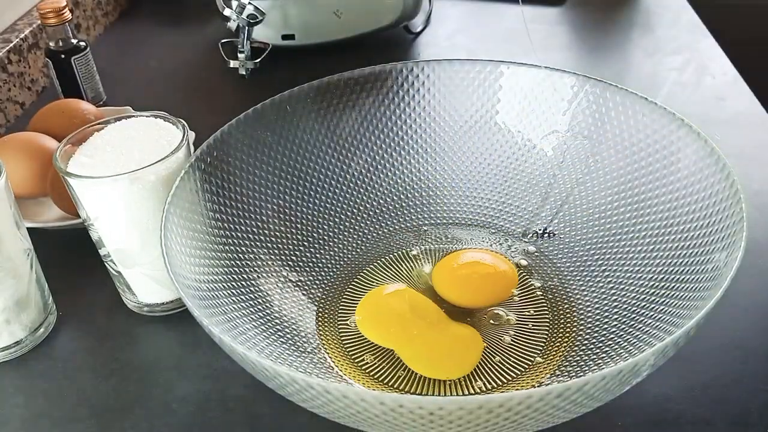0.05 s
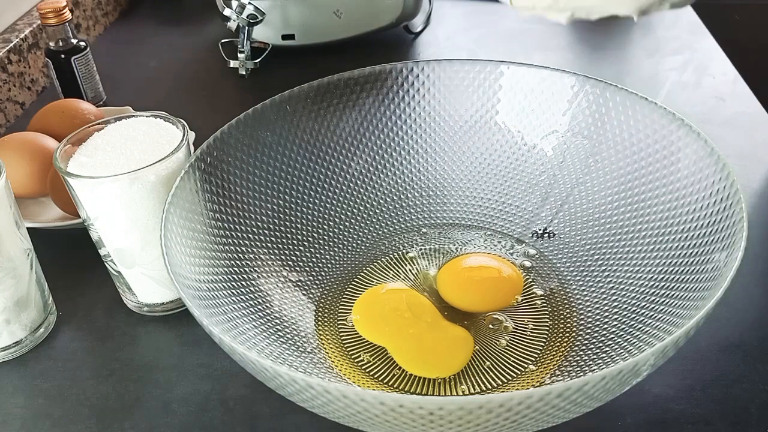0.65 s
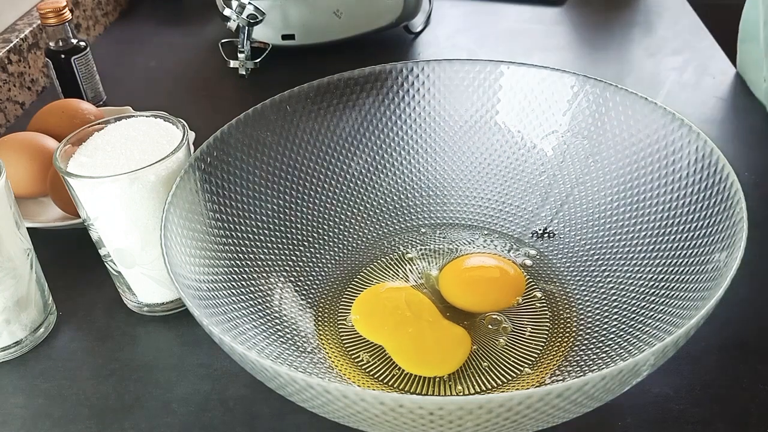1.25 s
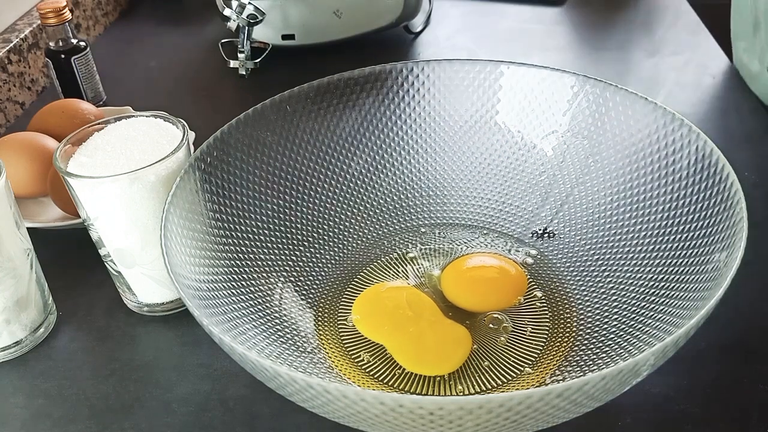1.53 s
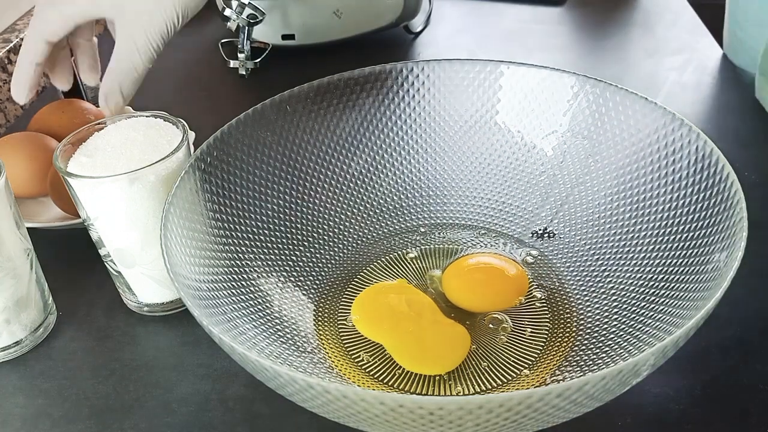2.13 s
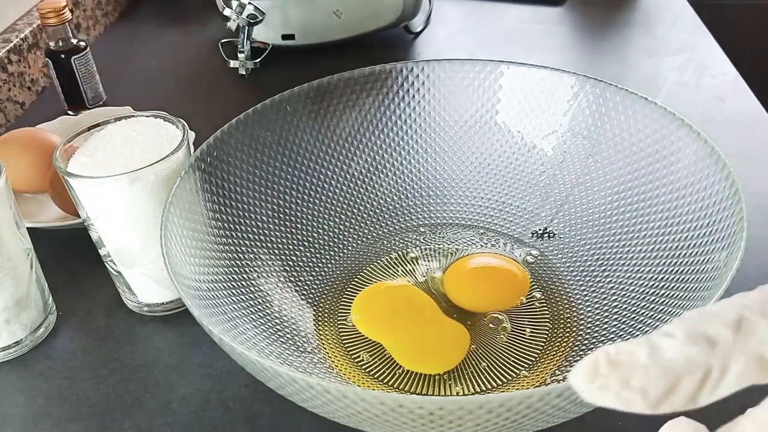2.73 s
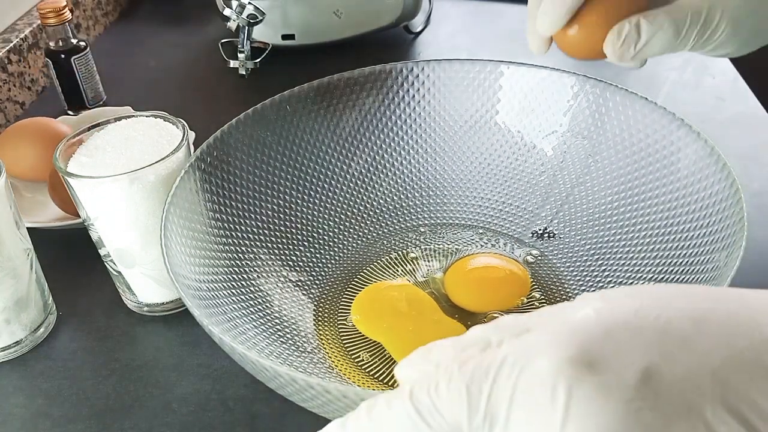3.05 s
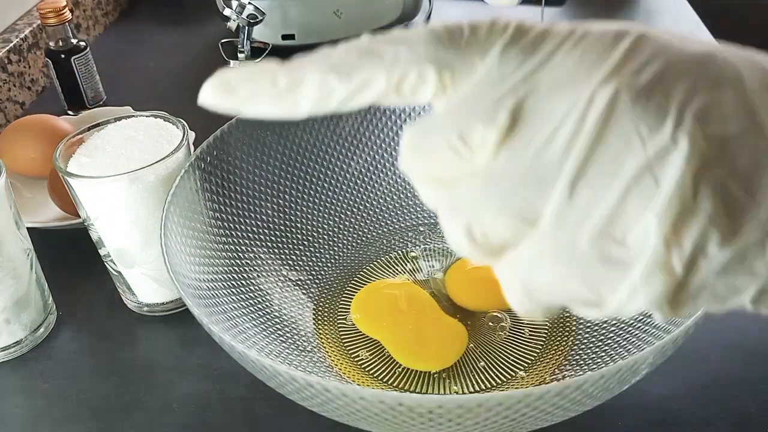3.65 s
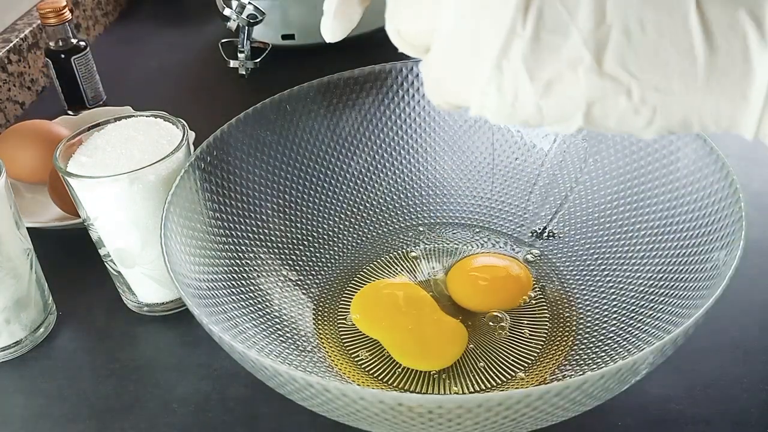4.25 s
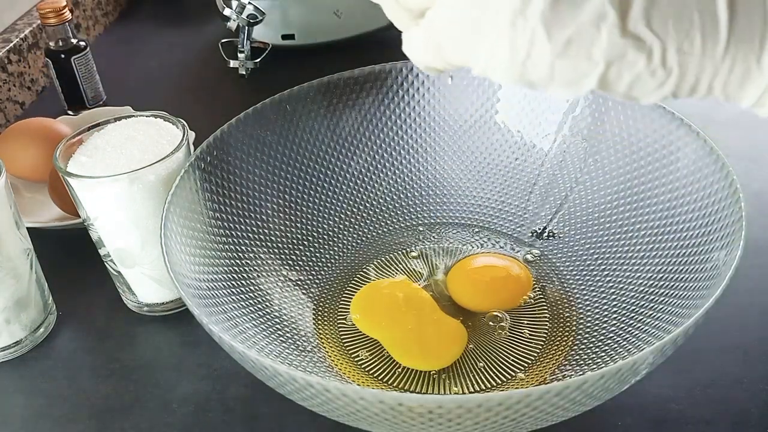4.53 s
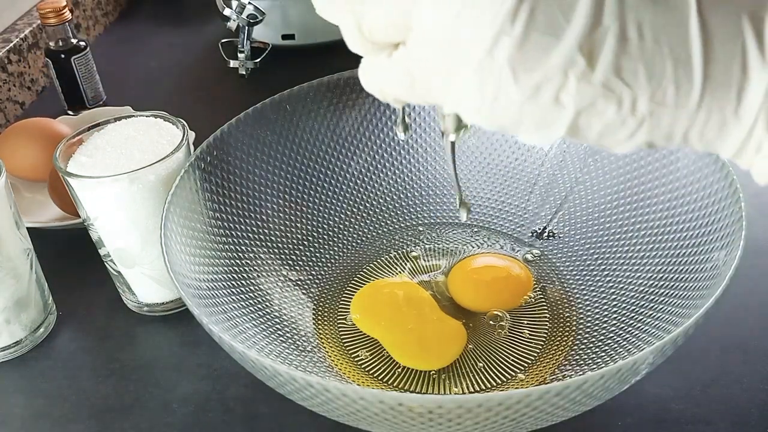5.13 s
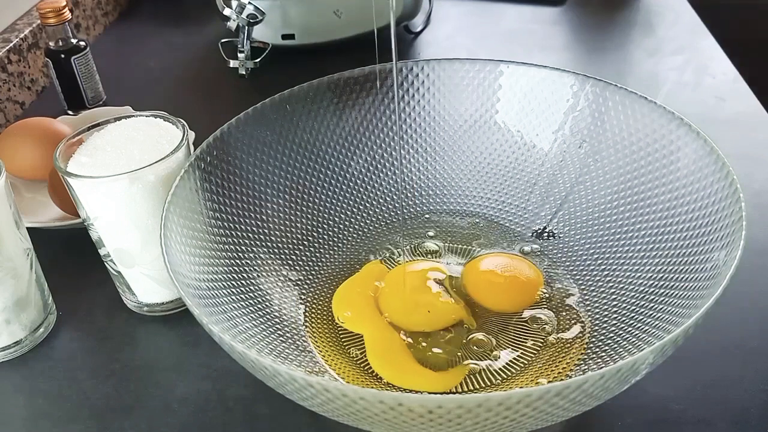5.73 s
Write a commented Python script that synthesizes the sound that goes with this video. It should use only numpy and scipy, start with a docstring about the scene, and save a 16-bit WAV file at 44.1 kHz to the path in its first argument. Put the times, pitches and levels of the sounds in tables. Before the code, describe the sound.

In a small, quiet kitchen, an emptied eggshell clicks and crunches softly as it is set aside. An egg is knocked twice on the counter, a dull thud and then a sharp, louder crack, each making a glass bowl ring briefly. The shell is prised apart in crisp little snaps and the egg drops into the bowl with a soft, wet slop. Rubber gloves rustle very faintly over a low room hum. Everything is heard up close.

```python
"""A small, live kitchen, where gloved hands break eggs over a glass bowl on the counter.
An emptied shell clicks and crunches as it is set aside. The next egg is knocked twice on the counter,
a thud and then a crack, and each jolt sets the bowl ringing. The shell is prised apart in crisp snaps
and the egg slops into the bowl in a gush of tiny bubbles. Rubber gloves rustle; the room hums faintly."""
import sys
import numpy as np
from scipy import signal
from scipy.fft import rfft, irfft, next_fast_len
from scipy.io import wavfile
from scipy.ndimage import uniform_filter1d

SR = 44100
rng = np.random.default_rng(int(sys.argv[2]) if len(sys.argv) > 2 else 0)


def transcribe(u):
    """Save the signal u as a 16-bit wav file named by the first command-line argument.

    u: samples, shape (n,) or (channels, n), limited to [-1, 1]; the rate is SR.
    q: integer samples, one column per channel.
    """
    v = np.clip(np.atleast_2d(u).T, -1, 1)
    q = np.round(v * 32767).astype(np.int16)
    wavfile.write(sys.argv[1], SR, q)


N = 258867
SIZE = 8192  # samples in a one-shot
TIME, AGE, LONG_AGE = np.arange(N) / SR, np.arange(SIZE) / SR, np.arange(3 * SIZE) / SR


# hits of egg on counter: t/s, level/dB, crumble t60/s, share of fracture/0-1
KNOCKS = [(3.227, -0.5, 0.013, 0), (3.2308, -8, 0.012, 0.3), (3.2354, -0.5, 0.017, 0.05),
          (3.2437, -5, 0.02, 0.03), (3.2498, -11, 0.042, 0.04), (3.2575, -11.5, 0.022, 0.18),
          (3.5129, -20, 0.022, 0.6), (3.5169, -2.5, 0.0028, .8), (3.5181, 8.5, 0.0044, 1),
          (3.5205, 1.5, 0.016, 1), (3.5317, -8.5, 0.033, 0.9), (3.5426, -9, 0.026, .8)]
# EQ of a blunt thud and of a cracking shell: f/Hz, level/dB
THUD_EQ = [(30, -27), (60, -28.5), (120, -8), (240, -10.5), (430, -3), (620, -5), (800, -1), (1000, -4),
           (1150, 0.5), (1400, -10.5), (1800, -15.5), (2900, -20.5), (4000, -31), (5600, -35), (6550, -18),
           (7100, -22.5), (10000, -37), (15000, -58)]
FRACTURE_EQ = [(30, -21.5), (60, -26.5), (120, -16.5), (240, -12.5), (550, -11), (800, -3), (1200, 2),
               (1750, 1), (2020, -5.5), (2300, 6), (2650, -6), (3050, -4), (3450, -13), (5800, -12.5),
               (7800, -6.5), (11000, -16.5), (13500, -21.5), (15500, -36)]
# pan of the knocks between the two microphone ports: f/Hz, left over right/dB
KNOCK_PAN = [(120, -1.5), (500, -1.5), (1100, -2.5), (2200, 6), (4500, 2), (7000, 6.5), (8500, -7),
             (13000, -2)]

def knocks(impact_gain=0.54, grain_db=4, room_db=-2, lag_s=0.00009):
    """The egg thuds, then caves in; each impact reaches the left port a little earlier."""
    out = np.zeros((2, N))
    pan_db = at_hz(KNOCK_PAN, np.fft.rfftfreq(SIZE, 1 / SR))
    thud, fracture = pulse(THUD_EQ, pan_db), pulse(FRACTURE_EQ, pan_db)
    impact = np.array([AGE == 0, AGE == AGE[round(lag_s * SR)]])
    for start, db, t60, broken in KNOCKS:
        grains = np.sqrt(1 - impact_gain ** 2) * crumble(t60, grain_db)
        force = whiten(grains + impact_gain * impact, t60)
        colour = np.sqrt(1 - broken) * thud + np.sqrt(broken) * fracture
        add(out, start, from_db(db) * through(force, colour))
    out = close_ports(out)
    return np.array([out, from_db(room_db) * out])


# modes of the glass bowl: f/Hz, level after the thud/dB, level after the crack/dB, t60/s
BOWL_MODES = [(301, -48, -47, .38), (348, -39, -42, .16), (421, -30, -42, .18), (478, -31, -35, .19),
              (598, -33, -33, .19), (680, -41, -43, .38), (752, -35.5, -42, .4), (797, -32, -38, .17),
              (875, -32, -39, .12), (1088, -22.5, -34, .12), (1222, -23.5, -28, .14), (1497, -34, -33, .13),
              (1613, -43, -48, .33), (1832, -38, -36, .18), (2215, -37, -35, .16), (2260, -41, -41, .29),
              (2326, -44, -46, .26), (2392, -42, -43, .18), (2966, -40, -41, .31), (3005, -36, -39, .13),
              (3738, -55, -52, .3), (4630, -56, -54, .28), (5526, -54.5, -55, .28), (6042, -56, -54, .28),
              (6565, -43, -50, .2), (6915, -48, -44, .22), (7297, -45, -45, .24), (7430, -55, -48, .16),
              (7617, -55, -50, .3), (7811, -53, -50, .25), (8300, -52, -43, .17), (8805, -58, -50, .22),
              (11400, -60, -54, .15), (13600, -64, -56, .13)]

def bowl(thud_s=3.2275, crack_s=3.5177, attack_s=0.00047, twin_detune=0.0069, twin_db=-7):
    """Jolts through the counter ring the glass; it is not quite round, so each mode beats with a twin."""
    out = np.zeros((2, N))
    for hz, *levels, t60 in BOWL_MODES:
        stereo_angle = np.arccos(at_hz(STEREO_LIKENESS, hz))
        for start, db in zip((thud_s, crack_s), levels):
            envelope = from_db(db) * decay(t60, LONG_AGE) * fade_in(attack_s, LONG_AGE)
            for pitch, gain in ((hz, 1), (hz * (1 + twin_detune), from_db(twin_db))):
                apart = stereo_angle * rng.choice([-1, 1])
                phase = rng.uniform(0, 2 * np.pi) + np.array([[0], [apart]])
                add(out, start, gain * envelope * np.sin(2 * np.pi * pitch * LONG_AGE + phase))
    return out


# shell snaps: t/s, level/dB, ring f/Hz, edge trim/dB, swell time constant/cycles, room send/dB
SNAPS = [(0, -29, 1910, -19.5, 0.73, 4), (.004, -38.5, 1760, -29, 2.1, -2),
         (0.0171, -29.5, 2240, -38, 2.1, -4), (0.0299, -27, 2070, -31, 0.88, 0.5),
         (0.0322, -31, 1620, -31, 1.8, -6), (.042, -34.5, 2040, -19, 0.71, -5),
         (0.1632, -40.5, 2090, -10.5, 0.73, -1), (0.1931, -32, 1770, -24, 0.84, -3.5),
         (1.788, -34, 1560, -35, 0.64, 0.5), (2.6046, -68, 5200, -8, 2, -6),
         (2.9928, -72, 4445, -8, 2.5, -2.5), (5.0979, -34, 2230, -12, 2.3, 0),
         (5.1362, -58, 2560, 1, 0.82, -3), (5.2299, -48.5, 2100, 4, 1.62, -2.5),
         (5.2743, -56, 2120, -7, 1.57, -1), (5.3211, -51.5, 1350, -3, 0.62, 1),
         (5.3214, -47, 2320, -9.5, 0.83, -8), (5.4074, -48, 1820, -3, 0.85, -7),
         (5.4093, -42.5, 2020, -7.5, 0.6, -3.5), (5.4556, -43, 4300, -15, 1.6, -5),
         (5.5143, -44, 3900, -7.5, 1.5, -0.5), (5.7452, -48, 2446, -5.5, 1.2, -1)]
# EQ of a half shell's body and of its crisp edge: f/Hz, level/dB
SHELL_EQ = [(400, -46), (900, -13.5), (1300, -9.5), (1600, -3.5), (2300, 5), (3000, -2.5), (4000, -15),
            (7000, -25), (14000, -39)]
CRISP_EQ = [(500, -10), (1500, 4), (3000, 4), (4500, 0), (6500, 6.5), (8500, 10.5), (10500, 1),
            (13500, -7.5), (16000, -30)]

def snaps(ring_db=3.5, edge_db=20, body_db=14.5, crumble_t60=0.018, ordinary_shell_hz=2100):
    """Each snap rings the half shell for a few cycles under a crisp edge; smaller pieces sound higher."""
    out, crisp = np.zeros((2, 2, N)), pulse(CRISP_EQ)
    for start, db, hz, trim_db, cycles, room_db in SNAPS:
        body = pulse(np.array(SHELL_EQ) * [hz / ordinary_shell_hz, 1])
        colour = from_db(edge_db + trim_db) * crisp + from_db(body_db) * body
        crackle = through(crumble(crumble_t60, grain_db=3.2), colour)
        ring = from_db(ring_db) * swell(hz, cycles / hz)
        add(out, start, from_db(db) * in_hands(start, ring + crackle, room_db))
    return out


# crunches and dry ticks: t/s, body level/dB, edge level/dB, t60/s, hollowness/0-1, attack/s
CRUNCHES = [(.240, -18.5, -29, 0.06, 0.92, 0.013), (0.2601, -20, -30, 0.019, 0.97, 0.00066),
            (0.464, -27, -42, 0.0098, 0.99, 0.00044), (0.6, -32.5, -59, 0.0036, 0.87, 0.00028),
            (.643, -24.5, -41.5, 0.053, 1, 0.00019), (1.165, -19, -31, 0.016, 0.42, 0.00035),
            (1.415, -25, -41, 0.081, 0.94, 0.0078), (1.558, -22.5, -23, 0.056, 0.83, 0.018),
            (1.729, -19, -28, 0.41, 0.75, 0.00078), (1.787, -9.5, -41, 0.11, 0.55, 0.00024),
            (1.899, -17.5, -19.5, 0.12, 0.23, 0.0011), (1.992, -17.5, -28, 0.048, 1, 0.00051),
            (2.099, -19, -30.5, 0.14, 0.1, 0.00079), (4.1468, -65, -46.5, 0.0095, 0.44, 0.0002),
            (4.2137, -50, -58, 0.046, 0.02, .002), (4.274, -58, -50, 0.014, 0.47, 0.00098),
            (4.365, -45, -43, 0.065, 0.37, .006), (4.869, -35, -36.5, 0.02, 0.43, 0.0014),
            (4.8991, -47, -28, 0.027, 0.3, .0005), (5.004, -42, -34.5, 0.016, 0.5, 0.0003),
            (5.068, -27.5, -31.5, 0.053, 0.39, 0.019), (5.1038, -36, -23, 0.014, 0.4, 0.00022),
            (5.1092, -40, -24.5, 0.011, 0, 0.00028), (5.139, -37, -26, 0.015, 0, .0003),
            (5.342, -52, -36, .03, .5, .001), (5.3863, -46, -24, 0.022, 0.2, 0.00033),
            (5.4564, -19.5, -26, 0.028, 0.57, 0.00018), (5.465, -36, -30.5, 0.041, 0.4, .002),
            (5.615, -39, -39.5, .03, 0.07, 0.0005)]
# EQ of a hollow cup of shell: f/Hz, level/dB
HOLLOW_EQ = [(290, -45.5), (500, -14), (730, -8.5), (950, 3), (1350, -7), (1800, -10), (2200, -8),
             (2900, -14), (3700, -25.5), (6500, -31), (11000, -48)]

def crunches(grain_db=5, room_db=-1.5):
    """Shell gives way or rubs in short runs of fractures; a whole cup sounds hollower than a piece."""
    out = np.zeros((2, 2, N))
    crisp, hollow, shell = pulse(CRISP_EQ), pulse(HOLLOW_EQ), pulse(SHELL_EQ)
    for start, body_db, edge_db, t60, hollowness, attack_s in CRUNCHES:
        layers = [(from_db(body_db) * np.sqrt(hollowness), hollow),
                  (from_db(body_db) * np.sqrt(1 - hollowness), shell),
                  (from_db(edge_db), crisp)]
        sound = sum(gain * through(crumble(t60, grain_db, attack_s), colour) for gain, colour in layers)
        add(out, start, in_hands(start, sound, room_db))
    return out


# ring-outs of half shells after hard snaps: t/s, level/dB, f/Hz, t60/s
CUP_RINGS = [(0.031, -42, 1905, 0.24), (.195, -60, 1900, 0.16), (5.099, -50, 2554, 0.2)]

def cup_rings(waver=0.33, attack_s=0.0039):
    """The hollow of a half shell rings on, wavering as it moves in the hand."""
    out = np.zeros((2, N))
    for start, db, hz, t60 in CUP_RINGS:
        wobble = waver * np.array([wander(AGE, step=256) for _ in range(2)])
        envelope = from_db(db) * decay(t60, AGE) * fade_in(attack_s, AGE)
        add(out, start, envelope * (1 + wobble) * np.sin(2 * np.pi * hz * AGE + wobble[::-1]))
    return out


# wet plops: t/s, level/dB, f/Hz, swell time constant/s, glide/share of pitch
PLOPS = [(0.245, -42, 1208, 0.0051, -0.13), (.261, -57, 990, 0.0027, -0.062),
         (.644, -58.5, 967, 0.002, -0.052), (.675, -54.5, 970, 0.002, -0.05),
         (1.348, -53, 902, .0045, 0.04), (1.992, -47, 988, 0.002, -0.05),
         (5.1, -55.5, 1068, 0.0026, -0.0023), (5.109, -47, 2550, .0009, .05),
         (5.124, -51, 2680, .0014, 0.00079), (5.137, -59.5, 1220, 0.0038, 0.003),
         (5.139, -54, 2360, 0.0024, 0.05), (5.4562, -51, 890, 0.0006, .02),
         (5.458, -53, 5930, 0.0011, 0.017), (5.466, -45.5, 6100, 0.0015, -0.011),
         (5.463, -42.5, 6700, 0.0011, 0.02), (5.4624, -45, 1055, 0.0015, 0.14),
         (5.466, -47, 1382, 0.0036, 0.108), (5.4805, -48.5, 2080, .0008, 0.074),
         (5.481, -48, 5950, 0.0023, 0.002), (5.485, -57, 1470, 0.0024, .03)]

def plops(roughness=0.8, room_db=-4):
    """Pockets of air ring briefly in the thick egg white, sliding in pitch as they open or close."""
    out = np.zeros((2, N))
    for start, db, hz, swell_s, glide in PLOPS:
        tone = swell(hz, swell_s, glide)
        rough_tone = tone * (1 + roughness * wander(AGE, step=64))
        add(out, start, from_db(db) * np.linalg.norm(tone) * unit_energy(rough_tone))
    return np.array([out, from_db(room_db) * out])


# gushes as the shell opens and the egg lands: fullest t/s, level/dB, low f/Hz, high f/Hz, t60/s
GUSHES = [(5.085, -62, 1400, 3000, .35), (5.462, -54, 1300, 3140, .15), (5.47, -63, 2760, 9000, .8)]

def squelch(bubbles=50, attack_s=0.015, size_db=5, cycles=0.75, glide=0.065, room_db=-4):
    """In each gush of egg white, tiny films and bubbles burst at random as short, rising blips."""
    out = np.zeros((2, N))
    for fullest, db, low_hz, high_hz, t60 in GUSHES:
        for when, pitch, size, pan in rng.random((bubbles, 4)):
            age = when * (attack_s + t60) - attack_s
            hz = low_hz * (high_hz / low_hz) ** pitch
            boost_db = size_db * min(-np.log(1 - size), 2)
            gain = from_db(db + boost_db) * gesture(age, attack_s, 0, t60)
            if fullest + age < TIME[-1]:
                blip = swell(hz, cycles / hz, glide)
                add(out, fullest + age, gain * blip * np.sqrt([[pan], [1 - pan]]))
    return np.array([out, from_db(room_db) * out])


# strokes of glove over shell: t/s, hold/s, level/dB
STROKES = [(0, 0.31, -70), (0.588, 0.032, -71), (1.311, 0.12, -68), (1.596, 0.38, -70), (1.952, 0.091, -64),
           (2.33, 0.076, -71.5), (2.716, 0.13, -75.5), (2.992, .08, -78.5), (3.708, 0.092, -67),
           (4.249, 0.11, -79.5), (5.02, 0.086, -70.5), (5.331, 0.16, -63)]
# EQ of the rubber rustle: f/Hz, level/dB
GLOVE_EQ = [(700, -11), (1500, 1.5), (2400, 4.5), (3500, -6), (5000, -12), (7500, -3), (9200, -5),
            (10500, -17.5), (14000, -32.5)]

def gloves(attack_s=0.05, release_t60=0.83, holding_db=-81.5, flutter_db=2, grain_db=0.5):
    """Rubber sticks and slips over shell in a faint, grainy rustle that swells with each stroke."""
    texture = from_db(flutter_db * wander(TIME, step=512) + grain_db * wander(TIME, step=64))
    strokes = [from_db(db) * gesture(TIME - start, attack_s, hold_s, release_t60)
               for start, hold_s, db in STROKES]
    envelope = np.maximum(np.max(strokes, axis=0), from_db(holding_db))
    return envelope * texture * noise_bed(GLOVE_EQ)


# EQ of a gloved palm on glass: f/Hz, level/dB
GRIP_EQ = [(90, -14), (180, -2), (380, 0), (750, -6), (1400, -16.5), (3000, -29), (6000, -44.5)]

def grip(start_s=2.98, attack_s=0.06, hold_s=0.2, release_t60=0.3, db=-67):
    """The palm steadies the bowl with a soft, low rub."""
    return from_db(db) * gesture(TIME - start_s, attack_s, hold_s, release_t60) * noise_bed(GRIP_EQ)


def thin_high_tone(start_s=3.92, attack_s=0.09, hold_s=0.17, release_t60=0.38, hz=9078, db=-82):
    """A faint, thin, narrow tone near 9 kHz swells and fades after the crack."""
    radius = np.exp(-np.pi * 70 / SR)  # two resonators in series, each 70 Hz wide
    poles = [1, -2 * radius * np.cos(2 * np.pi * hz / SR), radius ** 2]
    tone = signal.lfilter([1], np.convolve(poles, poles), rng.standard_normal((2, N)))
    envelope = from_db(db) * gesture(TIME - start_s, attack_s, hold_s, release_t60)
    return envelope * unit_energy(tone) * np.sqrt(N)


# length of the reverb tail: f/Hz, t60/s
REVERB_T60 = [(100, 0.52), (500, 0.49), (1200, 0.3), (2400, 0.44), (5000, 0.21), (8000, .39), (14000, 0.16)]
# EQ of the reverb tail: f/Hz, level/dB
REVERB_EQ = [(100, 1.5), (500, -3.5), (1200, -8), (2400, -9.5), (4500, -5), (8000, -8), (14000, -9.5)]

def kitchen_reverb(send, early_db=-4, early_t60=0.083, predelay_s=0.001516, attack_s=0.005, top_hz=12000):
    """Quick reflections from counter and bowl, then the tail of the room, dying band by band."""
    hz, centres = np.fft.rfftfreq(len(LONG_AGE), 1 / SR), np.geomspace(100, 14000, 9)
    noise_spectrum = rfft(diffuse(rng.standard_normal((2, len(LONG_AGE)))))
    response = 0
    for centre, weights in zip(centres, np.eye(len(centres))):
        band = irfft(noise_spectrum * at_hz(np.c_[centres, weights], hz))
        envelope = decay(at_hz(REVERB_T60, centre), LONG_AGE) * fade_in(attack_s, LONG_AGE)
        response += band * from_db(at_hz(REVERB_EQ, centre)) * unit_energy(envelope)
    add(response, predelay_s, from_db(early_db) * crumble(early_t60, grain_db=0.85))
    high_cut = signal.butter(8, top_hz, fs=SR, output="sos")
    return through(send, signal.sosfilt(high_cut, response))


# EQ of the room tone: f/Hz, level/dB
ROOM_TONE_EQ = [(25, -29), (50, -13), (90, 0), (170, -2.5), (250, -2), (450, -4), (800, -8), (1300, -17.5),
                (2300, -14), (3000, -20.5), (4300, -34.5), (7500, -36), (9300, -36.5), (12000, -59)]

def room_tone(noise_db=-65, motor_hz=95, motor_db=-77):
    """Soft room noise with the faint drone of an appliance, leaning slightly right."""
    motor = from_db(motor_db) * np.sin(2 * np.pi * motor_hz * TIME)
    return (from_db(noise_db) * noise_bed(ROOM_TONE_EQ) + motor) * from_db([[-0.4], [0.4]])


# the hands carry the empty shell away and return with the next egg: t/s, microphone distance/m
HAND_PATH = [(.7, 0.36), (1.15, 1), (2.2, 1), (3.1, 0.38)]

def in_hands(start, sound, room_db, over_bowl_m=0.3):
    """Direct sound and room send; only the direct sound falls as the hands move away."""
    distance = np.interp(start, *np.transpose(HAND_PATH))
    return np.array([over_bowl_m / distance * sound, from_db(room_db) * sound])


# stereo image of the room: f/Hz, left-right correlation/-1 to 1
STEREO_LIKENESS = [(25, -0.78), (70, 0.94), (250, 0.92), (500, 0.42), (1000, 0.039), (2000, -0.1),
                   (5000, 0.033), (12000, -0.22)]

def diffuse(pair):
    """Two unrelated noises become a diffuse field: alike in the bass, apart in the treble."""
    size = pair.shape[-1]
    alike = at_hz(STEREO_LIKENESS, np.fft.rfftfreq(size, 1 / SR))
    mid, side = rfft(pair) * np.sqrt([(1 + alike) / 2, (1 - alike) / 2])
    return irfft([mid + side, mid - side], size)


def close_ports(x, mono_below_hz=400):
    """The microphone ports lie close together, so the bass of a nearby knock reaches both alike."""
    mid, side = (x[0] + x[1]) / 2, (x[0] - x[1]) / 2
    side = signal.sosfilt(signal.butter(1, mono_below_hz, "high", fs=SR, output="sos"), side)
    return np.array([mid + side, mid - side])


def crumble(t60, grain_db, attack_s=1e-6):
    """A dying run of grains of uneven size, like tiny fractures, flat in colour."""
    noise = diffuse(rng.standard_normal((2, SIZE)))
    grain_gain = from_db(grain_db * np.repeat(rng.standard_normal(SIZE // 32), 32))
    return whiten(noise * grain_gain * decay(t60, AGE) * fade_in(attack_s, AGE) ** 2, t60)


def whiten(burst, t60):
    """Flatten the colour of a one-shot and gate off its second half."""
    spectrum = rfft(burst)
    power = uniform_filter1d(np.abs(spectrum) ** 2, size=int(1 / t60) + 1, axis=-1)
    flat = irfft(spectrum / np.sqrt(np.abs(power) + 1e-20))
    return unit_energy(flat * (AGE < AGE[-1] / 2))


def swell(hz, swell_s, glide=0):
    """A damped resonance that swells to height 1 at twice swell_s and dies away."""
    progress = AGE / swell_s
    envelope = (progress * np.exp(1 - progress / 2) / 2) ** 2
    return envelope * np.sin(2 * np.pi * hz * AGE * (1 + glide * np.tanh(progress / 10)))


def pulse(eq, pan_db=0):
    """The tightest (minimum-phase) click with a given EQ, optionally panned by frequency."""
    colour_db = at_hz(eq, np.fft.rfftfreq(SIZE, 1 / SR)) + pan_db * np.array([[0.5], [-0.5]])
    cepstrum = irfft(np.log(from_db(colour_db)))
    return unit_energy(irfft(np.exp(rfft(2 * cepstrum[:, :SIZE // 2], SIZE))))


def noise_bed(eq):
    """Steady diffuse noise with a given EQ, rms 1."""
    noise = diffuse(rng.standard_normal((2, next_fast_len(N + SIZE))))
    return unit_energy(through(noise, pulse(eq))[:, SIZE:SIZE + N]) * np.sqrt(N)


def wander(t, step):
    """A random modulator that glides to a new value every step samples."""
    return np.interp(t, t[::step], rng.standard_normal(len(t[::step])))


def gesture(age, attack_s, hold_s, release_t60):
    """An envelope that rises up to age 0, holds, then dies away."""
    return np.clip(1 + age / attack_s, 0, 1) ** 2 * decay(release_t60, np.maximum(age - hold_s, 0))


def fade_in(attack_s, age):
    return 1 - np.exp(-age / attack_s)


def decay(t60, age):
    return np.exp(-np.log(1000) * age / t60)


def from_db(db):
    return 10 ** (np.asarray(db) / 20)


def unit_energy(x):
    return x / np.sqrt(np.sum(x ** 2, axis=-1, keepdims=True) + 1e-20)


def at_hz(curve, hz):
    """Read a curve along log frequency."""
    curve_hz, values = np.transpose(curve)
    return np.interp(np.log(np.maximum(hz, 1)), np.log(curve_hz), values)


def add(track, start_s, sound):
    """Mix a sound in at its cue."""
    at = round(start_s * SR)
    track[..., at:at + sound.shape[-1]] += sound[..., :N - at]


def through(x, response):
    """Convolve, keeping the length."""
    return signal.fftconvolve(x, response, axes=-1)[:, :x.shape[-1]]


def scene():
    """Shell and egg feed the reverb; ring-outs, hand noises and the background join them dry."""
    direct, send = knocks() + snaps() + crunches() + plops() + squelch()
    return (direct + cup_rings() + bowl() + kitchen_reverb(send)
            + gloves() + grip() + room_tone() + thin_high_tone())


def record(dry, ceiling=0.72, top_hz=15300):
    """A soft clip rounds the sharpest peak, then a steep high cut trims the top."""
    rounded = ceiling * np.tanh(dry / ceiling)
    return signal.sosfilt(signal.ellip(10, 0.1, 80, top_hz, fs=SR, output="sos"), rounded)


dry = scene()
out = record(dry)
transcribe(out)
```